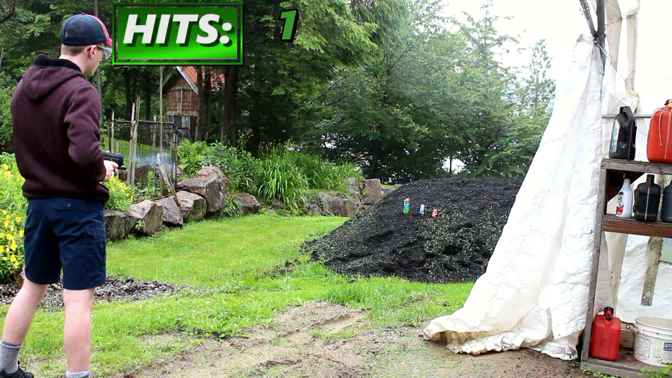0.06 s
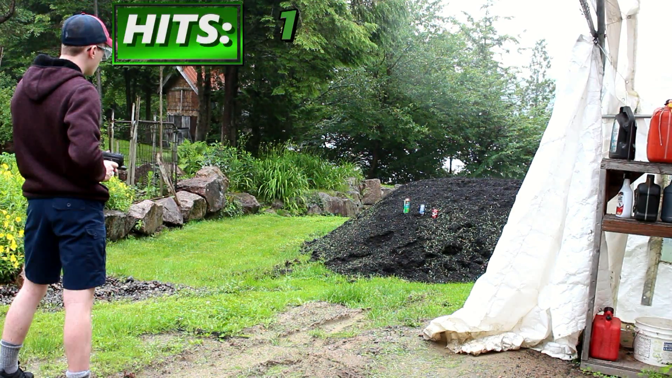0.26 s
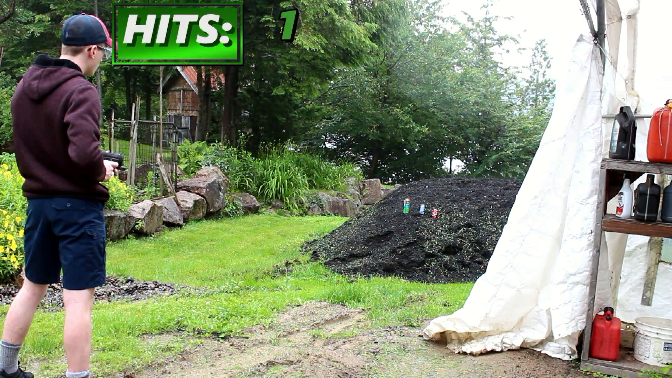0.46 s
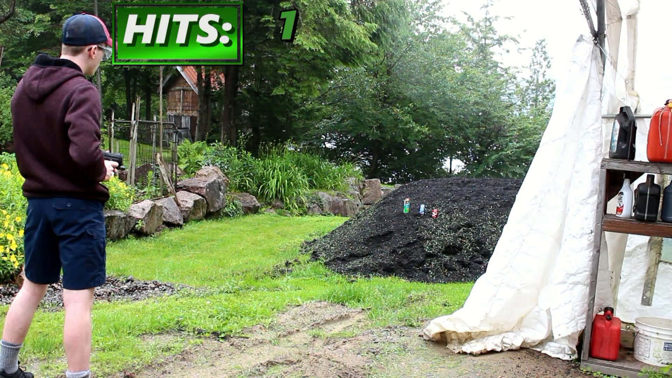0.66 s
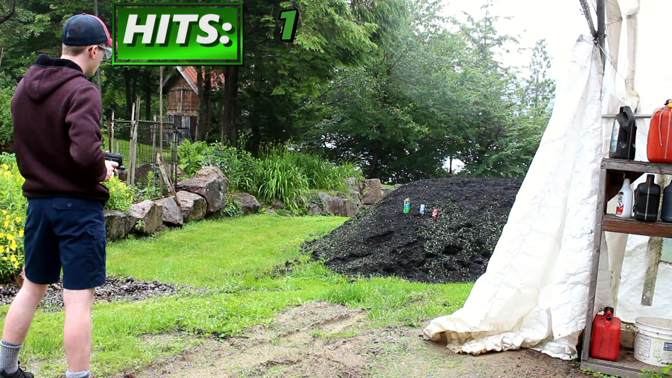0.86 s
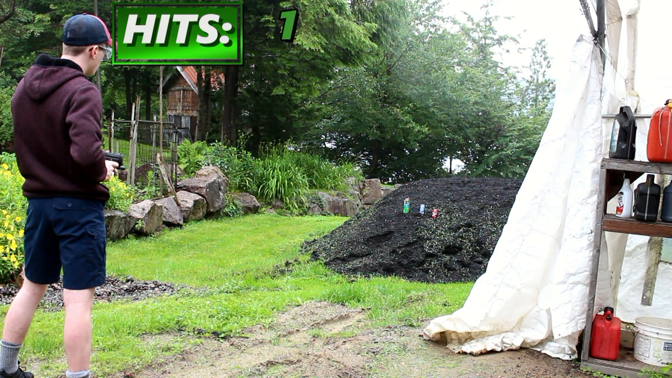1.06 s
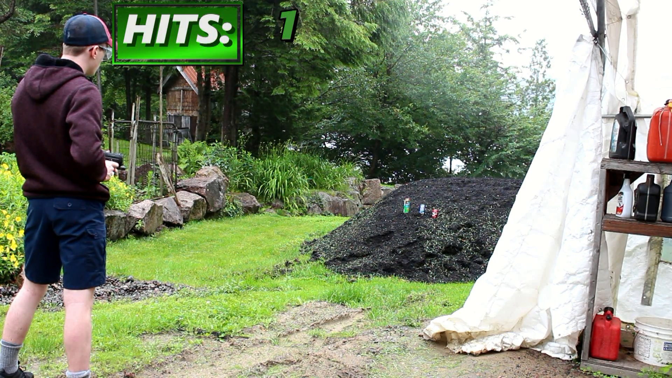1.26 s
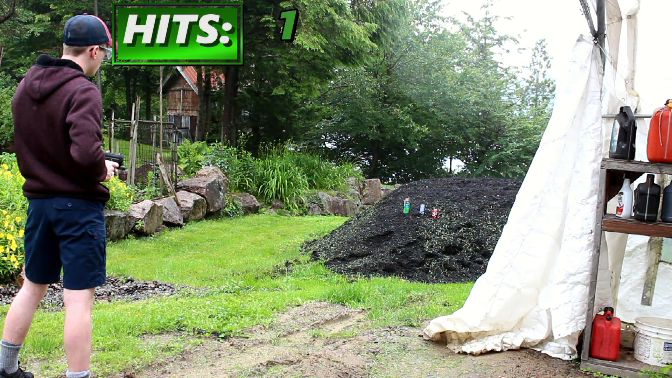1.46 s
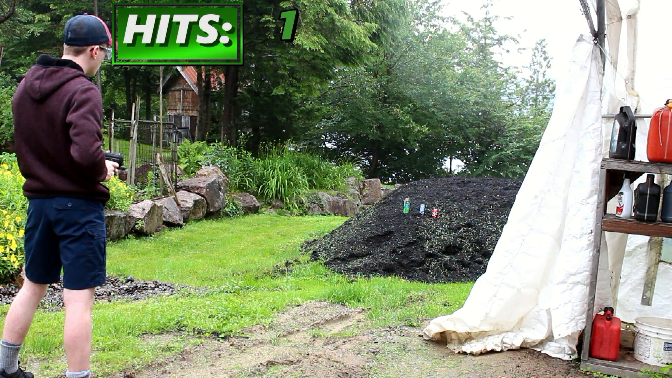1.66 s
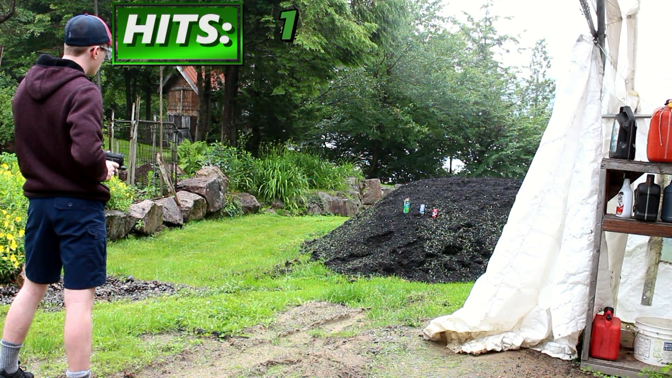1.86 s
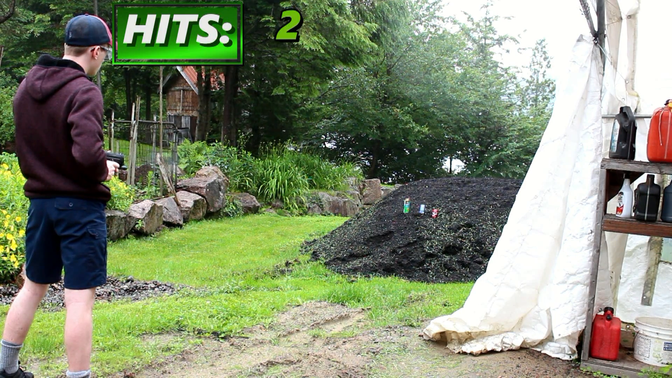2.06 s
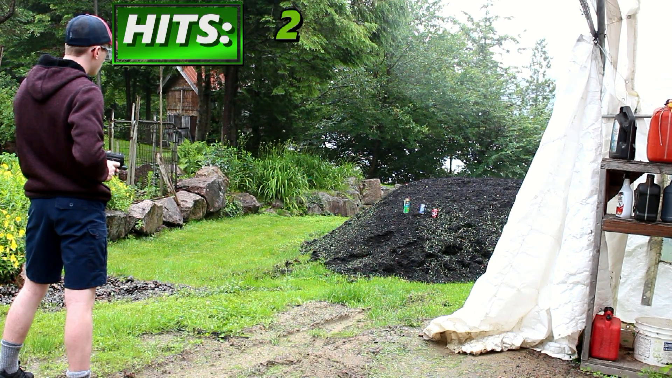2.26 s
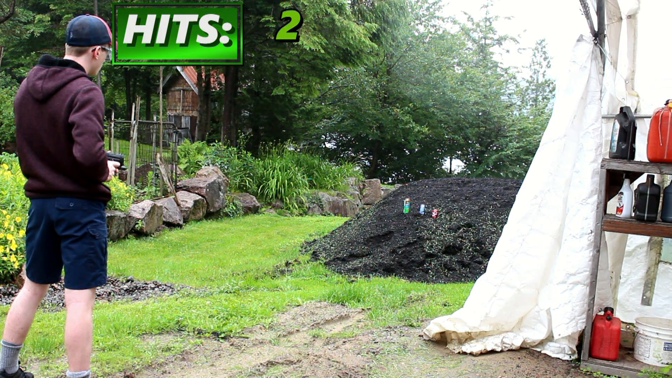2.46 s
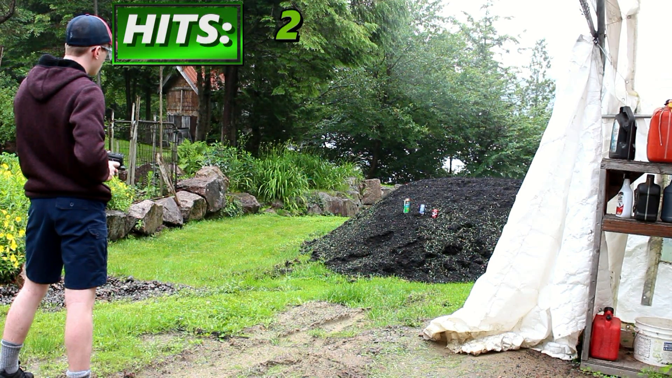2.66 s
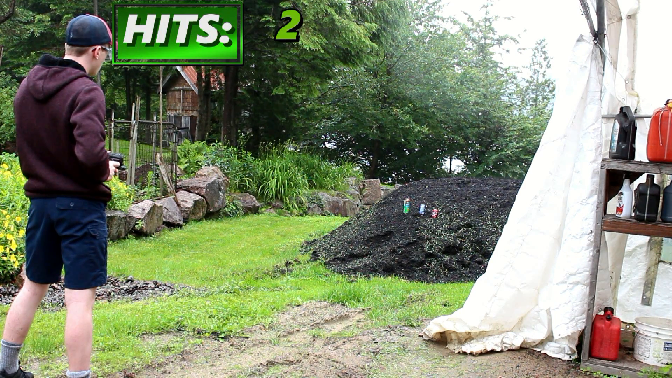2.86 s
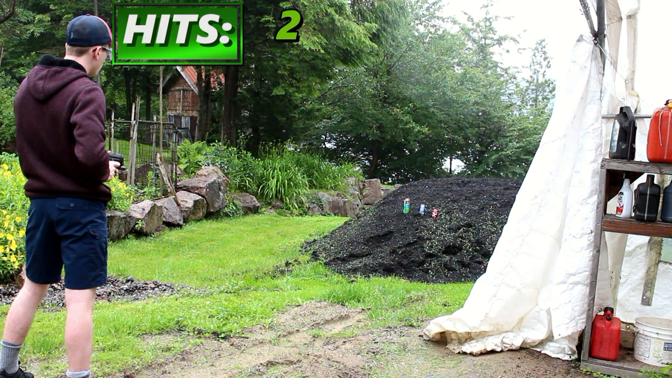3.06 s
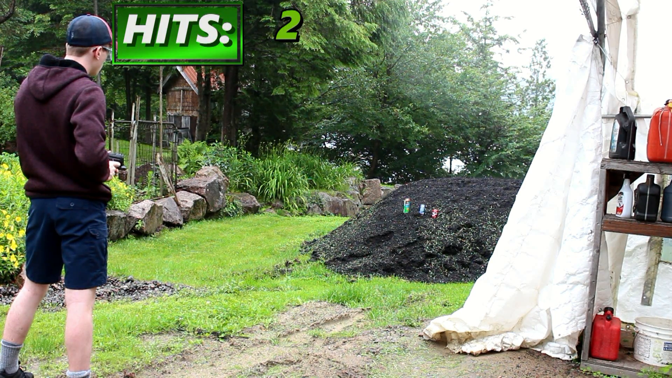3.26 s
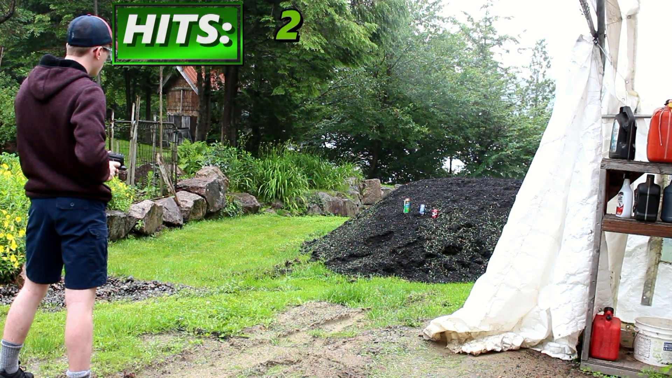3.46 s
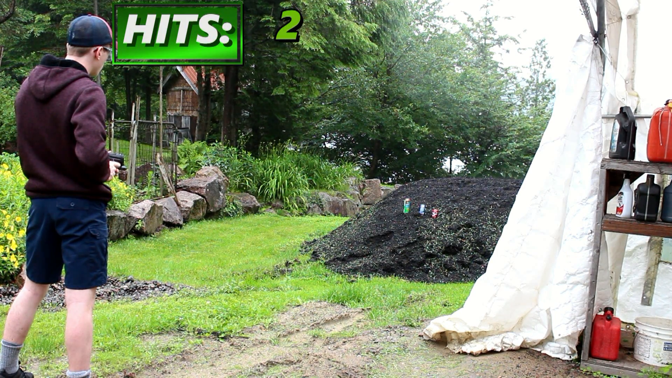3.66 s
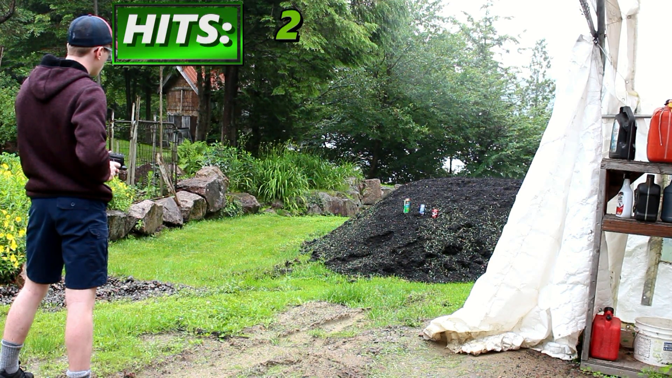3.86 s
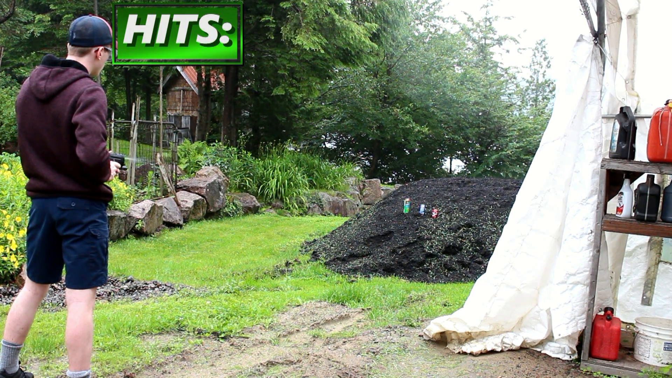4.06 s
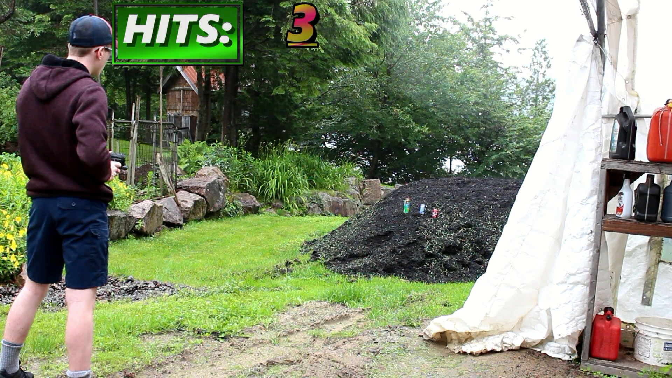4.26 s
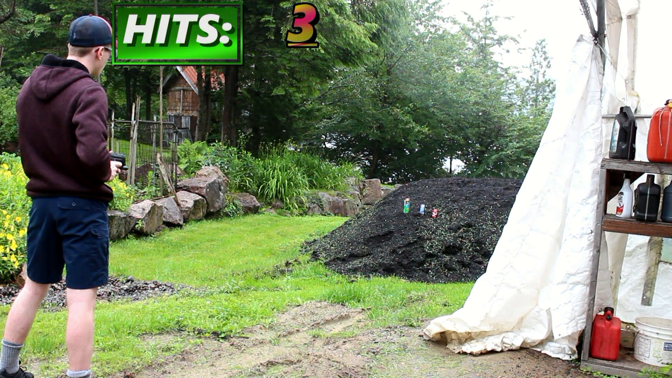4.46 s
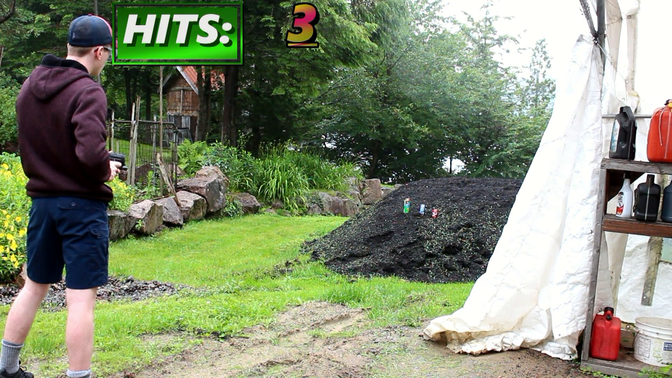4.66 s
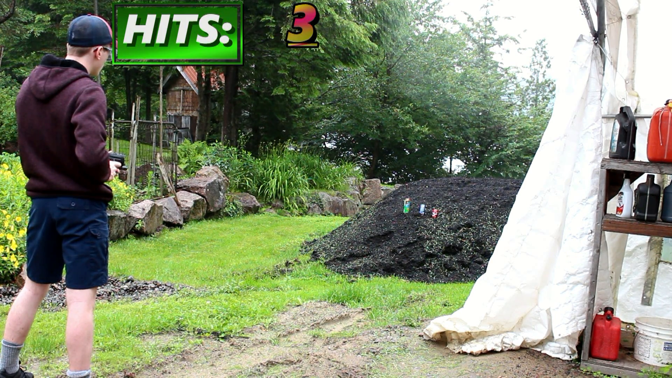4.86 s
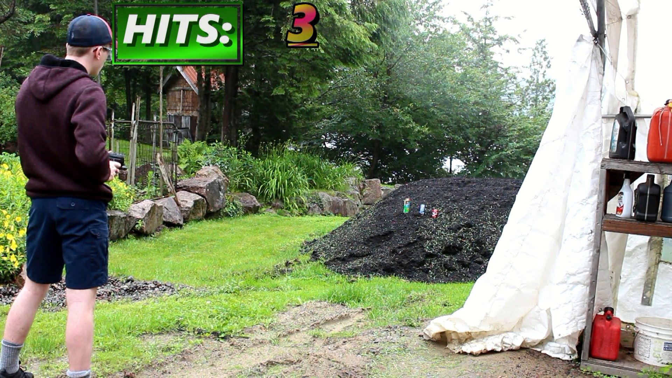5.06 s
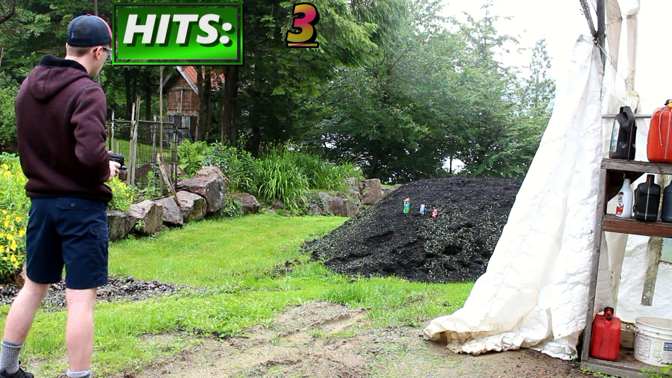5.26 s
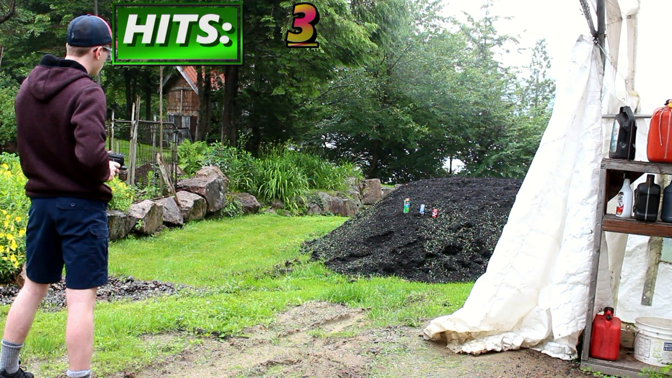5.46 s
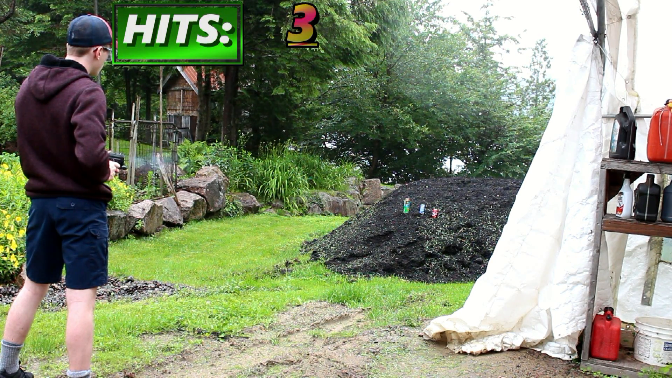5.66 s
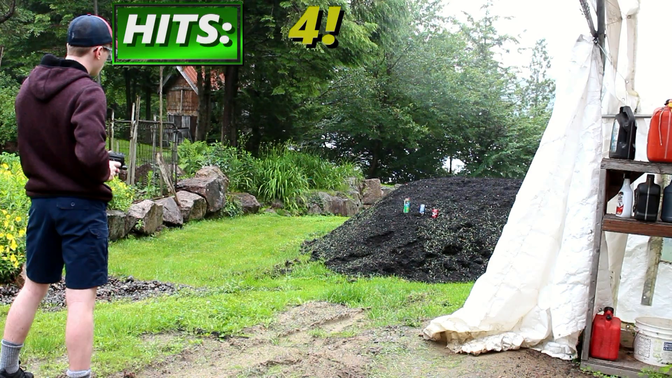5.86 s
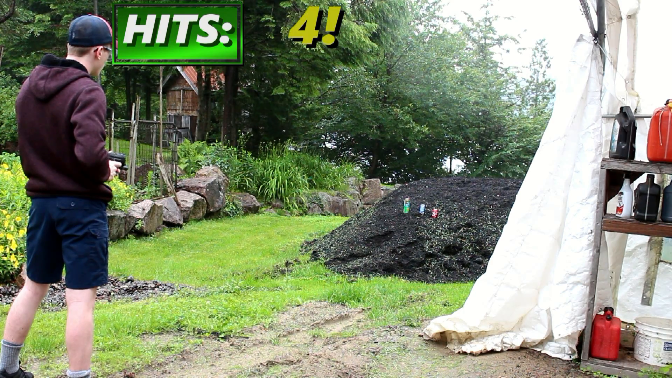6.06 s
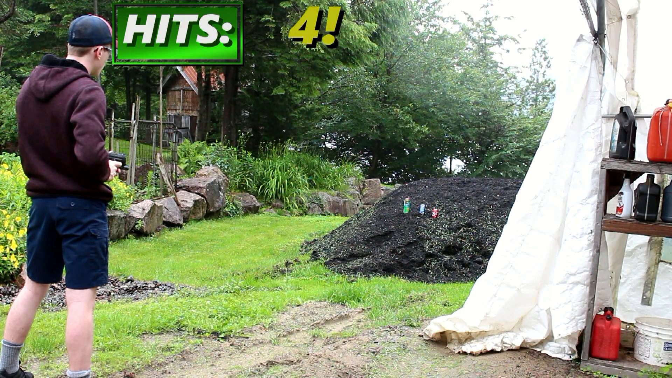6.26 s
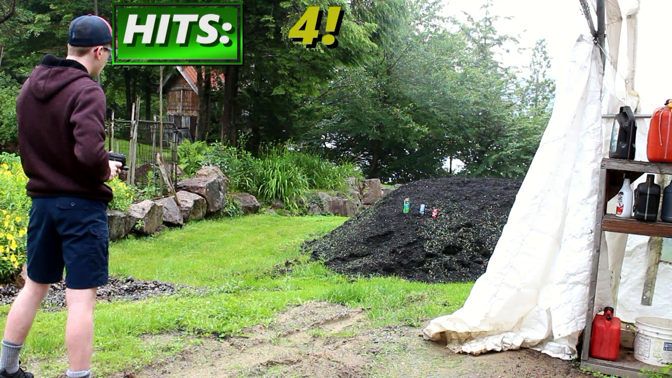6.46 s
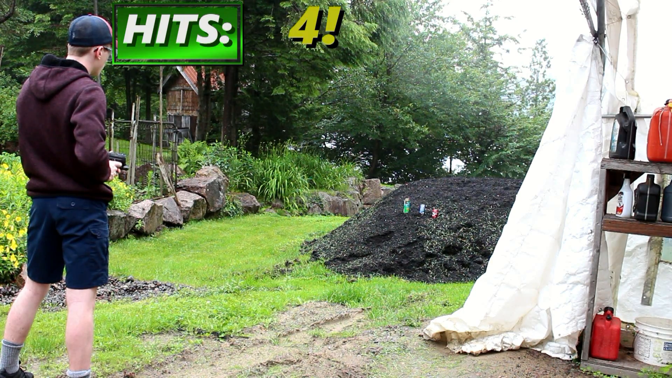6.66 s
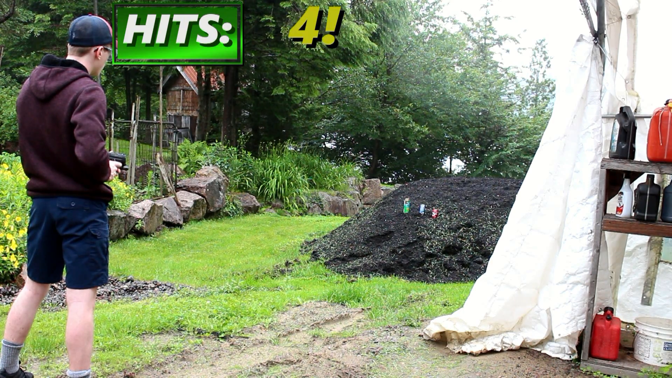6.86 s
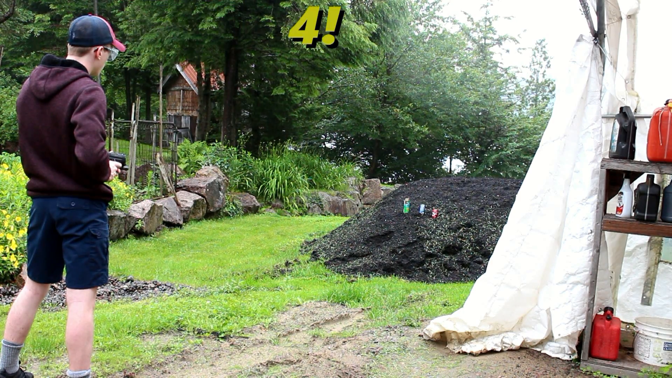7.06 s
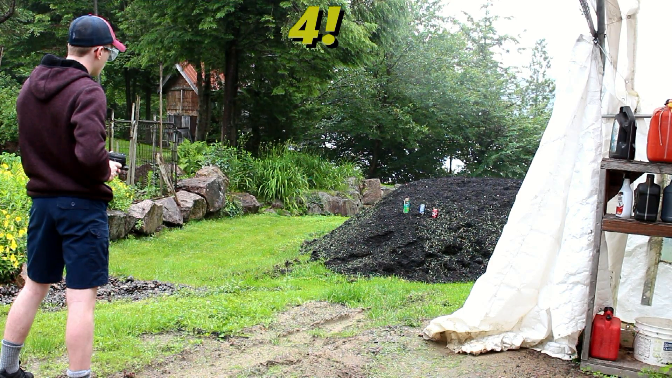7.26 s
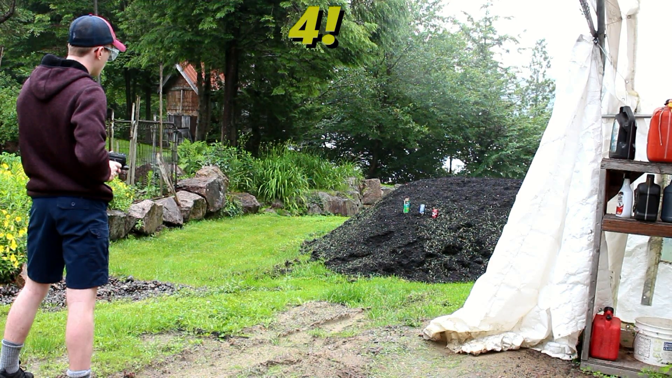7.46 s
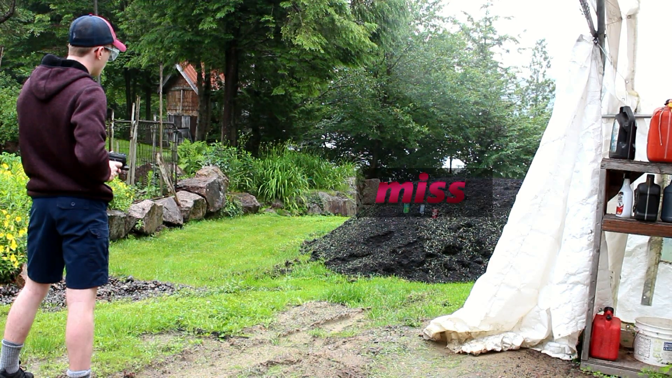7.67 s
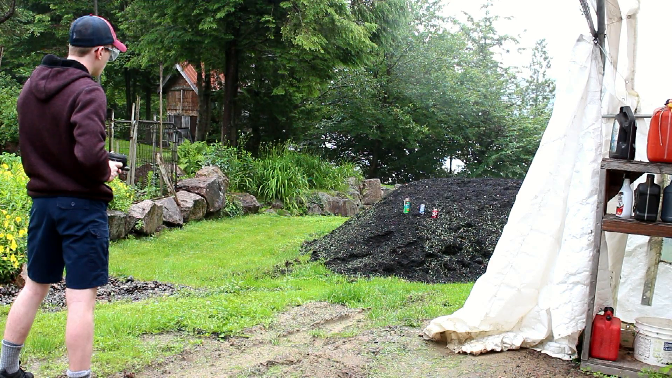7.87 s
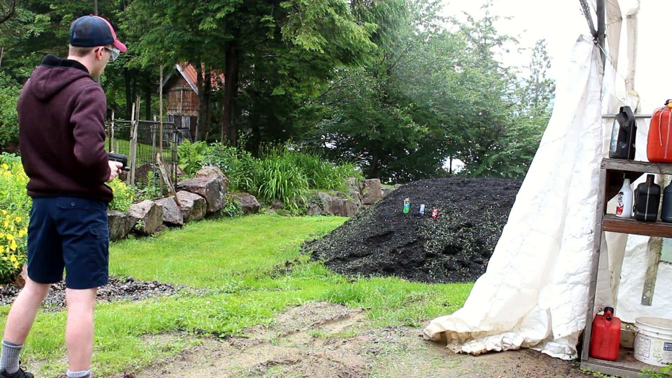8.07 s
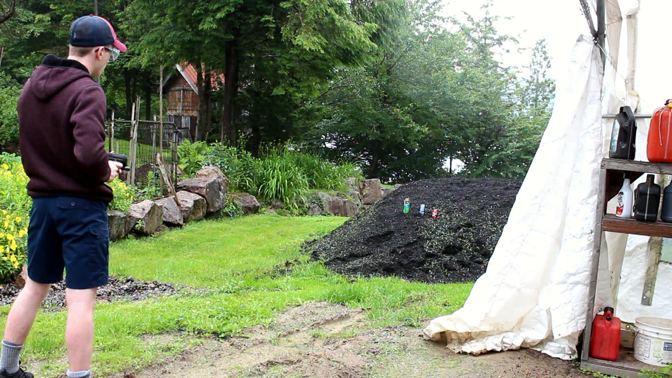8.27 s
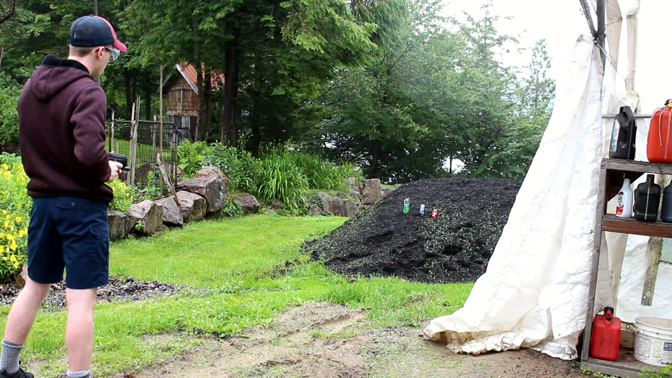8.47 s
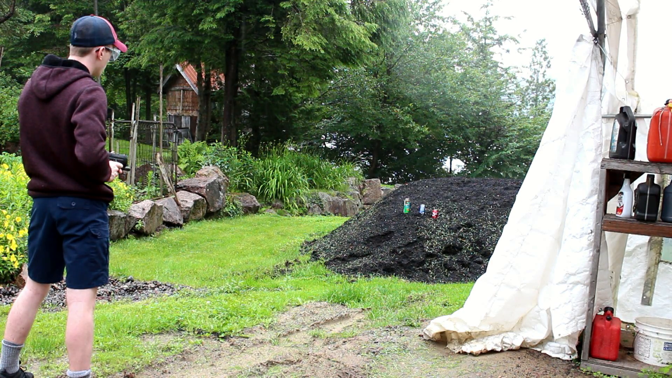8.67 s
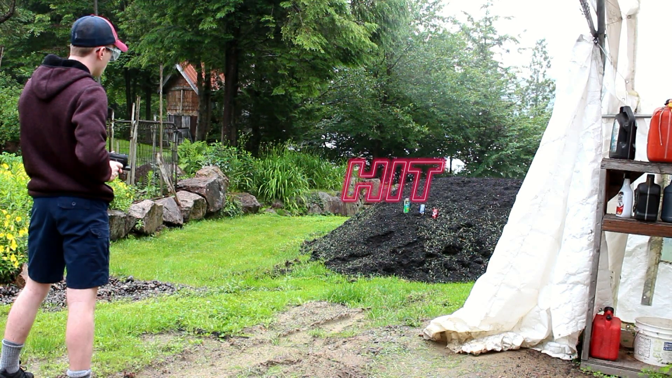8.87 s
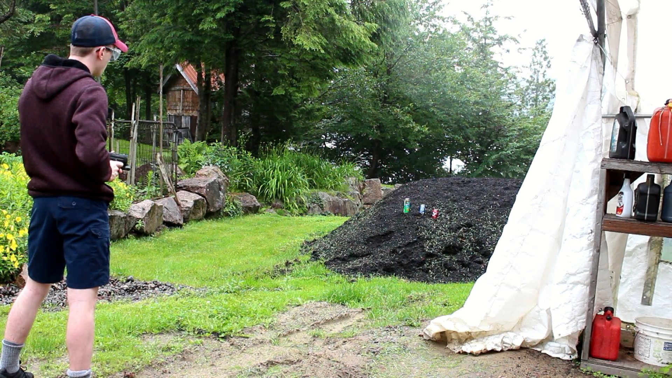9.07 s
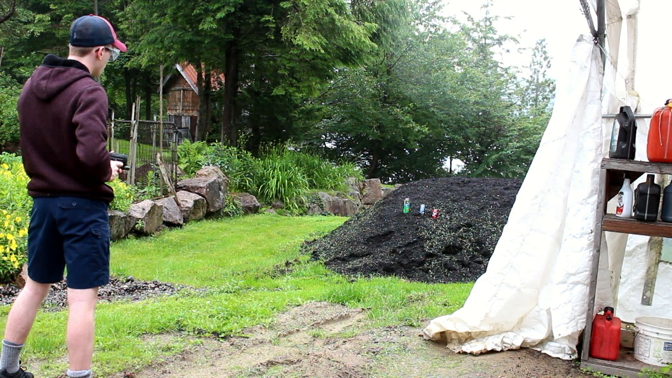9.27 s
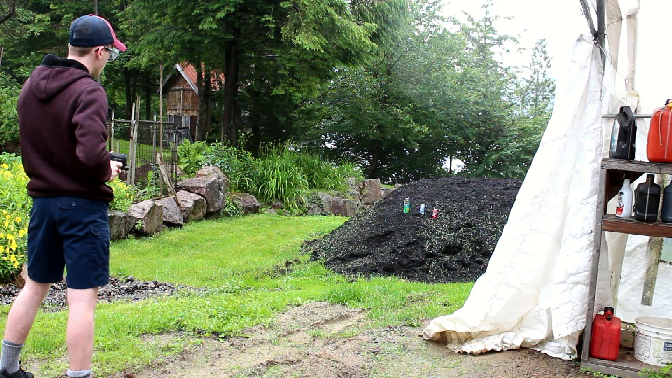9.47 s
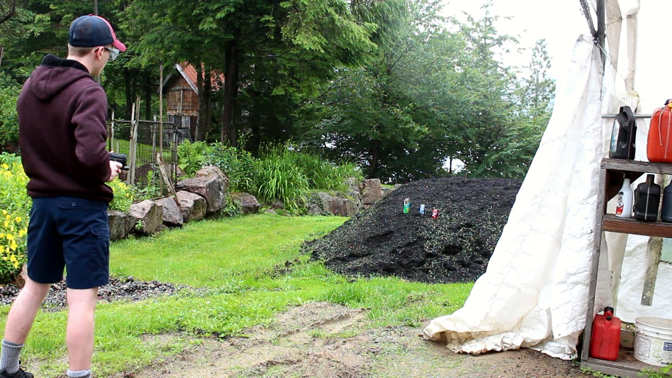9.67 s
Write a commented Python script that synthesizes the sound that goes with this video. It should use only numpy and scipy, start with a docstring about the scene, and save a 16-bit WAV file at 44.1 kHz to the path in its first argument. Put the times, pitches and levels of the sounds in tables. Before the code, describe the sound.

Sharp dry pops from a pellet pistol, close and clipping a mono microphone, each with a brief gas hiss and scattered outdoor echo. A tinny smack on a small can comes less than a tenth of a second after every shot except the fifth. Between shots there is only low leaf rustle, faint muffled bumps, light metallic clicks and slight hiss. Six shots in under ten seconds.

```python
"""A backyard: a gas pistol fires six pellets, and five of them smack a thin metal can some metres away.
Each crack is a train of pressure spikes and shaped noise coming back from the ground, a shed and trees.
The can is a set of decaying wall and body modes. Leaves rustle as patchy noise; soft far thuds and the
trigger's ticks fill the gaps. A mono microphone overloads on the peaks over its own hiss and hum."""
import sys
import numpy as np
from scipy import signal
from scipy.io import wavfile
from scipy.ndimage import uniform_filter1d

SR = 44100
rng = np.random.default_rng(int(sys.argv[2]) if len(sys.argv) > 2 else 0)


def transcribe(u):
    """Save the signal u as a 16-bit wav file named by the first command-line argument.

    u: samples, shape (n,) or (channels, n), limited to [-1, 1]; the rate is SR.
    q: integer samples, one column per channel.
    """
    v = np.clip(np.atleast_2d(u).T, -1, 1)
    q = np.round(v * 32767).astype(np.int16)
    wavfile.write(sys.argv[1], SR, q)


def invert_db(x):
    """Field ratio 10**(x/20) for x, a level in decibels (scalar or array-like)."""
    u = np.asarray(x, float) / 20
    return 10 ** u


N = 429093

# Colour of the leaves, also of the thuds. Each row: frequency in Hz, relative density in dB per Hz.
RUSTLE_SPECTRUM = [(15, -55.5), (25, -22), (49, -5), (70, -5.5), (88, -10.5), (124, -15.5), (175, -8.5),
                   (385, -6.5), (457, -5.5), (846, 0), (1570, -6.5), (2830, -8), (6220, -27), (9000, -38),
                   (11700, -59), (19800, -120)]


def evened(x):
    """Scales to rms 1."""
    return x / np.sqrt(np.mean(x ** 2) + 1e-20)


def read(points, hz):
    """Reads a spectrum on a log-frequency axis."""
    f, value = np.transpose(points)
    return np.interp(np.log(hz + 1), np.log(f + 1), value)


def add(mix, start_s, sound):
    """Mixes a sound in at start_s."""
    part = mix[round(start_s * SR):][:len(sound)]
    part += sound[:len(part)]


def noise(size, field_db, frame=256):
    """Random short-time spectra whose level in dB follows field_db(hz, s)."""
    hz = np.fft.rfftfreq(frame, 1 / SR)[:, None]
    s = np.arange(size * 4 // frame + 2) * frame / 4 / SR
    real, imag = rng.standard_normal((len(s), len(hz), 2)).T
    spectra = (real + 1j * imag) * invert_db(field_db(hz, s))
    return signal.istft(spectra, nperseg=frame, noverlap=frame * 3 // 4)[1][:size]


def scatter(rise_s, near_db, near_t60_s):
    """Dense echoes of energy 1: a near cluster, the yard band by band up to the trees, a dull far tail."""
    # Scattered sound of the yard. Each row: frequency in Hz, relative density in dB per Hz.
    yard_spectrum = [(35, -56), (60, -31.5), (202, 0.5), (515, -11.5), (946, 3.5), (1340, -6.5),
                     (1550, -1.5), (2300, -3.5), (3040, 0.5), (6430, -11.5), (7570, -13), (11000, -12),
                     (16000, -27)]
    # Decay of the yard. Each row: frequency in Hz, t60 in s.
    yard_decay = [(100, .3), (300, 0.26), (1000, 0.33), (3000, 0.45), (6000, 0.49), (12000, 0.36),
                  (16000, 0.5)]
    far_db, far_t60_s, trees_s = -20, 1.215, 0.059

    def field_db(hz, s):
        # less comes back from behind the trees
        beyond_db = -(3 + 7 * hz / 12000) / (1 + np.exp((trees_s - s) / 0.016))
        yard = invert_db(beyond_db - 60 * s / read(yard_decay, hz))
        far = invert_db(far_db - 60 * s / far_t60_s) / np.sqrt(1 + (hz / 4000) ** 2)
        return read(yard_spectrum, hz) + 10 * np.log10(yard ** 2 + far ** 2)

    t = np.arange(SR) / SR
    # single reflectors stand out
    grain = invert_db(2.0 * evened(uniform_filter1d(rng.standard_normal(len(t)), size=60)))
    near = invert_db(near_db - 60 * t / near_t60_s)
    tail = noise(len(t), field_db) * grain * (1 - np.exp(-t / rise_s)) * (1 + near)
    return tail / np.linalg.norm(tail)


def rustle():
    """Leaves: noise in drifting patches with a wide-band flicker, following the breeze."""
    # Each row: time in seconds, rustle level in dB rms.
    breeze = [(0, -54.5), (1.9, -54.5), (3.05, -53.5), (3.9, -55), (4.8, -54), (5.6, -54.5), (6.4, -54.5),
              (7.15, -54), (7.9, -55), (8.15, -52.5), (8.7, -55.5), (9.73, -54.5)]

    def field_db(hz, s):
        white = rng.standard_normal((len(s), len(hz))).T
        patches = evened(uniform_filter1d(uniform_filter1d(white, size=8, axis=0), size=16, axis=1))
        flicker = evened(uniform_filter1d(rng.standard_normal(len(s)), size=7))
        return read(RUSTLE_SPECTRUM, hz) + 1.34 * patches + 1.53 * flicker

    level_db = np.interp(np.arange(N) / SR, *np.transpose(breeze))
    return invert_db(level_db) * evened(noise(N, field_db, frame=512))


def thuds():
    """Dull far bursts in the colour of the leaves, with a smeared fall; short ones start with a knock."""
    # Each row: start in seconds, level in dB, t60 in s.
    soft_thuds = [(.778, -41.5, 0.3), (1.022, -37.5, 0.28), (1.237, -40, 0.32), (1.347, -42.5, 0.39),
                  (2.051, -40, 0.19), (2.875, -42, 0.15), (2.931, -45, 0.16), (3.001, -40.5, 0.5),
                  (4.017, -41, 0.16), (4.655, -38.5, 0.21), (4.985, -39, 0.32), (5.324, -40.5, .12),
                  (5.53, -47, 0.15), (5.56, -45.5, 0.12), (6.206, -41.5, 0.14), (6.359, -42, .15),
                  (6.998, -38, 0.26), (7.163, -42, 0.47), (7.714, -40.5, 0.14), (7.884, -40, 0.33),
                  (8.844, -40.5, 0.21), (9.645, -35, 0.22)]
    rise_ms_per_s, treble_db_per_octave = 9.7, -4  # longer thuds swell more slowly
    knock_gain = 2.4  # for a 1 ms rise
    faint_count, faint_db, faint_t60_s = 8, -45, 0.12  # quieter ones fall at random
    t, out = np.arange(SR // 3) / SR, np.zeros(N)
    faint = [(place * N / SR, faint_db + 4 * spread, faint_t60_s)
             for place, spread in rng.random((faint_count, 2))]
    for start_s, db, t60_s in soft_thuds + faint:
        def field_db(hz, s):
            octaves = np.clip(np.log2(hz / 1300 + 1e-9), 0, 1.5)
            return read(RUSTLE_SPECTRUM, hz) + treble_db_per_octave * octaves - 60 * s / t60_s

        rise_ms = rise_ms_per_s * t60_s
        body = noise(len(t), field_db)
        swell = 1 - np.exp(-1000 * t / rise_ms)
        knock = np.sin(2 * np.pi * 950 * t) * np.exp(-t / 0.0012) / rise_ms ** 1.5
        add(out, start_s, invert_db(db) * (body / np.abs(body).max() * swell + knock_gain * knock))
    return out


def ticks():
    """Trigger and small metal ticks: a snap, a brief ring at its pitch and a bright scrape."""
    # Each row: start in seconds, level in dB, pitch in Hz, scrape in dB relative to the tick.
    metal_ticks = [(0.471, -48, 5300, -15), (.53, -42.5, 3300, -24), (1.824, -49.5, 2080, -18.5),
                   (1.977, -40.5, 2550, -17), (3.981, -50, 4430, -9), (4.112, -54, 2620, -0.5),
                   (5.607, -37, 2570, -19.5), (7.243, -42.5, 4200, -29), (7.405, -42, 2540, -13),
                   (8.747, -37, 2570, -20), (9.109, -34.5, 905, -32), (9.168, -41, 2500, -22),
                   (9.404, -45, 4950, -25)]
    t, out = np.arange(SR // 20) / SR, np.zeros(N)
    for start_s, db, hz, scrape_db in metal_ticks:
        grit = rng.standard_normal(len(t) + 1)
        ring_s = .004 * min(1, (2600 / hz) ** 3)  # smaller parts die sooner
        snap_and_ring = 1.5 * np.exp(-t / .00025) + .55 * np.exp(-t / ring_s)
        ring = np.sin(2 * np.pi * hz * t) * snap_and_ring
        scrape = invert_db(scrape_db) * np.diff(grit) * np.exp(-t / 0.0056)
        add(out, start_s, invert_db(db) * (ring + scrape))
    return out


def can():
    """The pellet's click drives the wall modes nearest the dent; the body rattles and rings on."""
    # Pellet on can. Each row: start in seconds, blow in dB, two loudest spots of the dent in Hz and Hz,
    # long ring in dB.
    hits = [(0.2157, -1.5, 2200, 3570, -48), (2.163, -2.5, 1940, 3680, -40), (4.2376, -4, 2200, 3450, -25),
            (5.8019, -2.5, 1420, 2570, -29), (8.9495, 0.5, 1000, 2700, -41)]
    # Dented wall of the can. Each row: frequency in Hz, level in dB, t60 in s.
    wall_modes = [(800, -10, .03), (1000, -8, .03), (1420, -3, .03), (1940, -2, .025), (2200, 0, .03),
                  (2450, -2, .025), (2970, -3, .03), (3230, -2, .03), (3580, -4, .025), (4360, -6, .025),
                  (5300, -9, .02), (6300, -12, .02), (7500, -11, .012), (8560, -11, .012),
                  (9870, -12, .012), (11200, -12, .012)]
    # Long rings of the can body. Each row: frequency in Hz, level in dB, t60 in s.
    shell_modes = [(525, -18.5, 0.64), (665, -15.5, 0.69), (795, -11, 0.37), (1028, -7, 0.37),
                   (1112, -9.5, 0.62), (1536, -4, 0.28), (1710, -9, 0.41), (1930, -4.5, 0.25),
                   (1413, 1, 0.24), (2290, 0, 0.19), (3010, 6, 0.139), (3290, -7, 0.26)]
    echo_db = 9  # every pellet brings the same energy, so the yard answers each hit alike
    t, out = np.arange(SR // 2) / SR, np.zeros(N)
    bounce = round(.0009 * SR)
    for start_s, db, low_hz, high_hz, ring_db in hits:
        hz, mode_db, t60_s = np.transpose(wall_modes)[:, :, None]
        detune, uneven = rng.standard_normal((len(hz), 2)).T[:, :, None]
        near_db = 8.0 * sum(np.exp(-.5 * (np.log2(hz / spot) / .12) ** 2) for spot in (low_hz, high_hz))
        wall_gain = invert_db(mode_db + near_db + 1.1 * uneven - 60 * t / t60_s)
        wall = wall_gain * np.sin(2 * np.pi * hz * (1 + 0.016 * detune) * t)
        click = np.sin(2 * np.pi * 2600 * t) * np.exp(-t / 0.00054)
        click += .5 * np.sin(2 * np.pi * 9500 * t) * np.exp(-t / 0.00013)
        smack = click + invert_db(-13.5) * wall.sum(0)
        smack[bounce:] += 0.045 * smack[:-bounce]  # off the ground under the can
        hz, mode_db, t60_s = np.transpose(shell_modes)[:, :, None]
        rough = rng.standard_normal((len(hz), len(t)))
        rattle = 1.3 + evened(uniform_filter1d(rough, size=200, axis=1))
        tones = np.sin(2 * np.pi * (hz * t + rng.random(hz.shape)))
        shell = rattle * invert_db(mode_db + ring_db - 60 * t / t60_s) * tones
        add(out, start_s, invert_db(db) * (smack + shell.sum(0) * (1 - np.exp(-t / 0.0053))))
        add(out, start_s, invert_db(echo_db) * scatter(0.0015, 19.3, 0.031))
    # a small can sends out no bass
    return signal.sosfilt(signal.butter(3, 420, "high", fs=SR, output="sos"), out)


def paths():
    """Rows of (delay ms, dB, blur ms): the single spikes and stepped echoes off the shed's planks."""
    # Valve pop, muzzle blast, ground bounce, near post, two walls. Each row: delay in ms, level in dB.
    spikes = [(0, -1), (1.27, 3), (3.58, 3), (5.75, -7), (25.0, -14), (39.5, -17)]
    sharp_ms, blur_per_ms = .024, .002  # spike width with no delay, widening with delay
    planks, first_ms, spacing_ms = 9, 10.6, .345
    middle_db, edge_db, plank_blur_ms = -11.5, -3, 0.057  # loudest in the middle of the wall
    single = [(ms, db, sharp_ms + blur_per_ms * ms) for ms, db in spikes]
    shed = [(first_ms + k * spacing_ms, middle_db + edge_db * place ** 2, plank_blur_ms)
            for k, place in enumerate(np.linspace(-1, 1, num=planks))]
    return single + shed


def pistol():
    """A hammer click, then a short pressure spike with a slow suction on every path, gas hiss and echoes."""
    # Each row: start in seconds, blast in dB.
    shots = [(.14487, 0), (2.0905, -.5), (4.16494, 0), (5.72821, 0), (7.4832, 0), (8.87648, 0)]
    lead_ms = 3  # hammer ahead of the valve pop
    rebound_ms, rebound_khz, rebound_fade_ms, rebound_db = 1.328, 3.12, 0.2, -1
    t_ms, out = np.arange(SR // 16) / SR * 1000, np.zeros(N)
    after_ms = t_ms - lead_ms
    released = after_ms > 0
    stream = signal.butter(2, [5000, 15500], "band", fs=SR, output="sos")
    shed = scatter(0.0024, 19, 0.023)  # stays the same from shot to shot
    # the open shed booms briefly
    hollow = sum(np.sin(2 * np.pi * khz * t_ms) for khz in (.86, 1.14)) * np.exp(-t_ms / 7)
    for start_s, db in shots:
        crack = np.zeros(len(t_ms))
        for ms, path_db, blur_ms in paths():
            shift, uneven = rng.standard_normal(2)
            u = after_ms - ms - .01 * shift  # the shooter's hand moves a little
            suction = .28 * (u > 0) * np.exp(-np.abs(u) / .7)
            crack -= invert_db(path_db + 1.1 * uneven) * (np.exp(-.5 * (u / blur_ms) ** 2) - suction)
        # the muzzle air springs back after the blast
        u = np.maximum(after_ms - rebound_ms, 0)
        crack += invert_db(rebound_db) * np.sin(2 * np.pi * rebound_khz * u) * np.exp(-u / rebound_fade_ms)
        strike = np.sin(2 * np.pi * 1.2 * t_ms) + .5 * np.sin(2 * np.pi * 2.3 * t_ms)
        strike += .2 * rng.standard_normal(len(t_ms))
        hammer = t_ms * np.exp(-t_ms / 1.4) * strike
        # bright gas stream
        jet = signal.sosfilt(stream, rng.standard_normal(len(t_ms))) * np.exp(-t_ms / 17) * invert_db(-21)
        # the released gas shoves the air; the air column of the barrel rings once
        push = released * np.sin(2 * np.pi * 0.1 * after_ms) * np.exp(-t_ms / 14) * invert_db(-16)
        barrel = released * np.sin(2 * np.pi * 0.472 * after_ms) * np.exp(-t_ms / 5) * invert_db(-12)
        add(out, start_s - lead_ms / 1000, invert_db(db) * (crack + barrel + push + invert_db(-20) * hammer))
        add(out, start_s, invert_db(db + 9.5) * scatter(0.00067, 0.85, 0.086))
        add(out, start_s, invert_db(db) * jet)
        add(out, start_s + .0098, invert_db(db + 9.0) * shed)
        add(out, start_s + .0105, invert_db(db - 20.0) * hollow)
    return out


def scene():
    """One microphone feeds both channels."""
    return np.tile(rustle() + thuds() + ticks() + can() + pistol(), (2, 1))


def low_pass(x):
    """Removes everything above the highest recorded frequency."""
    return signal.sosfilt(signal.butter(12, 16460, fs=SR, output="sos"), x)


def record(dry):
    """Bass cut of the microphone, mains hum, shared noise, each channel's own hiss, hard overload."""
    # Hiss of each channel. Each row: frequency in Hz, relative density in dB per Hz.
    hiss_spectrum = [(20, -16), (50, -14), (120, -14), (400, -27), (2000, -29), (5000, -29.5),
                     (10000, -29.5), (13500, -30), (16000, -32)]
    # Noise shared by both channels. Each row: frequency in Hz, relative density in dB per Hz.
    capsule_spectrum = [(1500, -16.5), (5000, 0), (10000, -14), (14000, 1.5), (16000, -5)]
    # Each row: frequency in Hz, level in dB rms.
    hum_tones = [(59.2, -75)]
    t = np.arange(N) / SR
    heard = signal.sosfilt(signal.butter(3, 240, "high", fs=SR, output="sos"), dry)
    hum = sum(invert_db(db) * np.sqrt(2) * np.sin(2 * np.pi * hz * t) for hz, db in hum_tones)
    shared = invert_db(-79) * evened(noise(N, lambda hz, s: read(capsule_spectrum, hz)))
    own = invert_db(-64.5) * np.array([evened(noise(N, lambda hz, s: read(hiss_spectrum, hz), frame=2048))
                                 for _ in range(2)])
    return low_pass(np.clip(heard + hum + shared + own, -1, 1))


dry = scene()
out = record(dry)
transcribe(out)
```